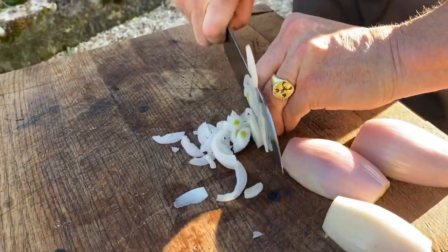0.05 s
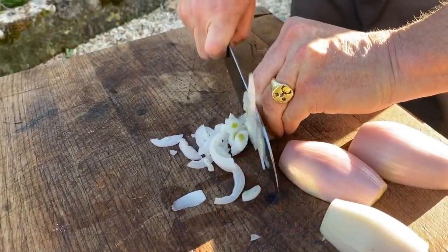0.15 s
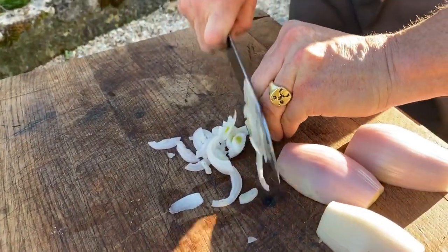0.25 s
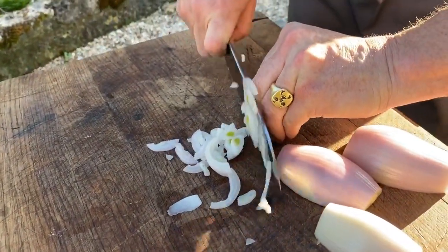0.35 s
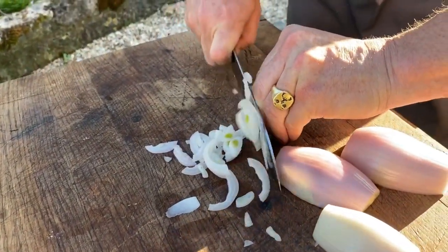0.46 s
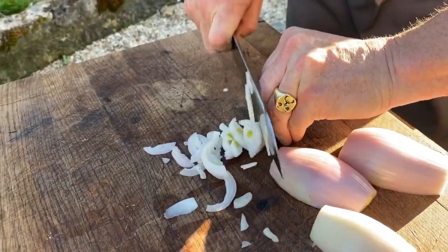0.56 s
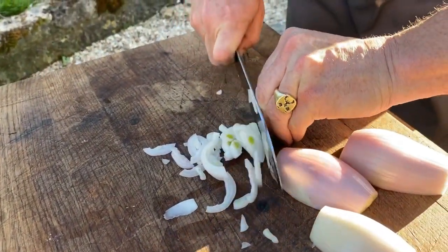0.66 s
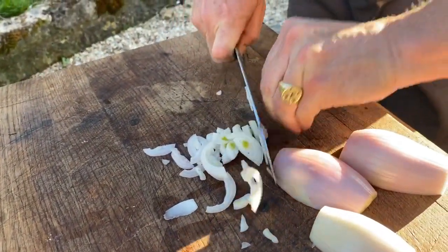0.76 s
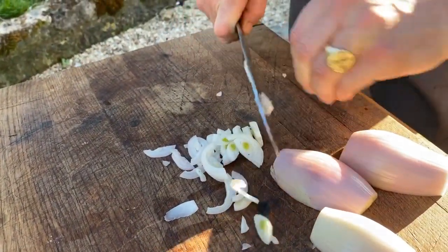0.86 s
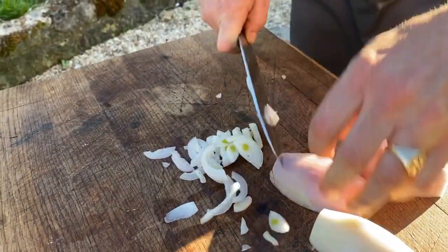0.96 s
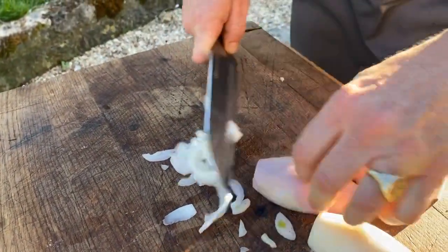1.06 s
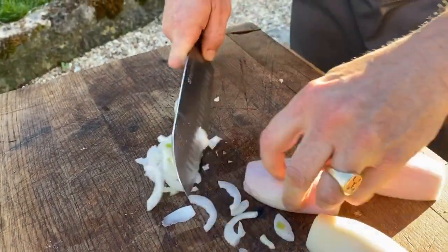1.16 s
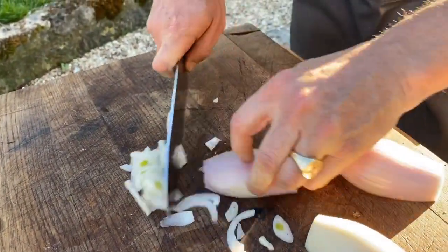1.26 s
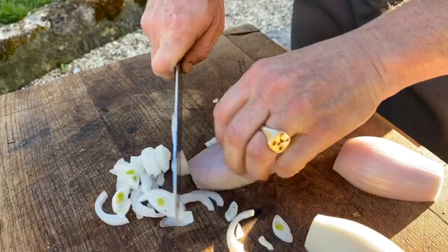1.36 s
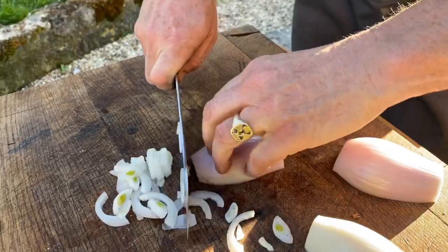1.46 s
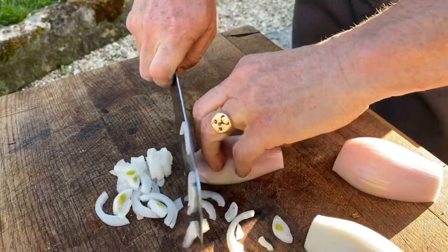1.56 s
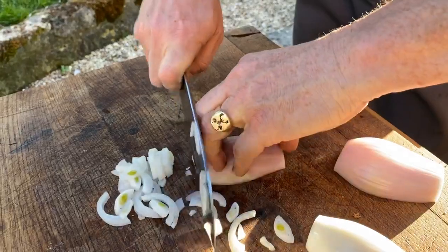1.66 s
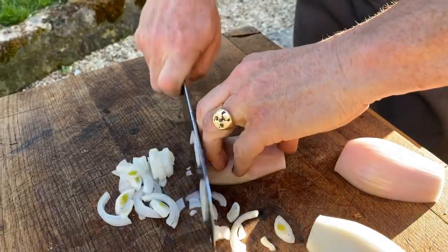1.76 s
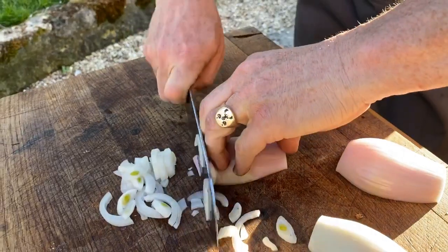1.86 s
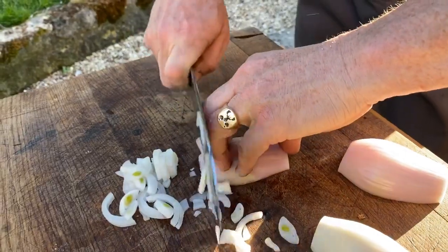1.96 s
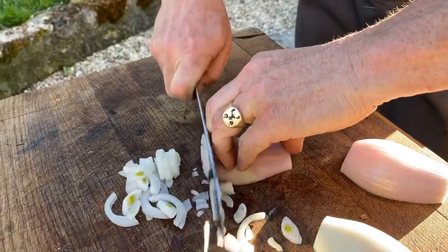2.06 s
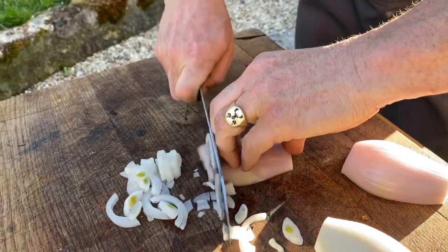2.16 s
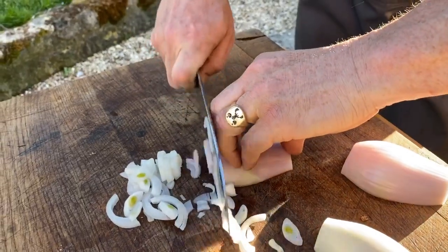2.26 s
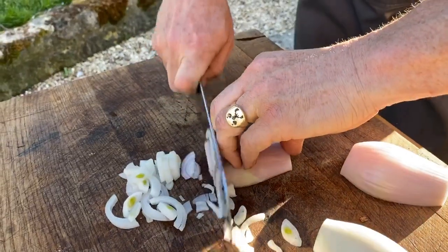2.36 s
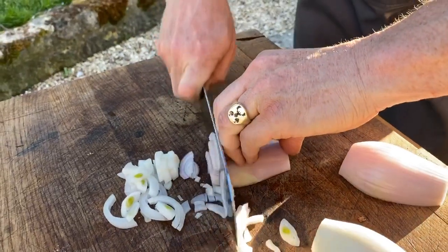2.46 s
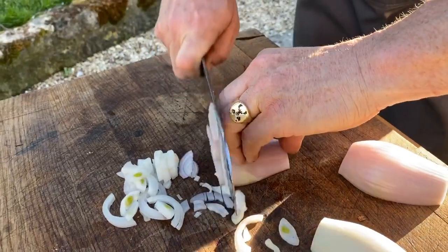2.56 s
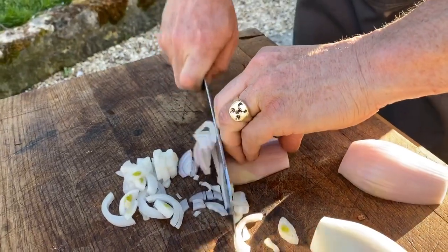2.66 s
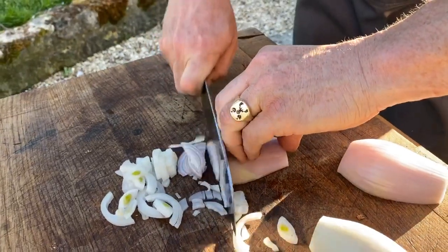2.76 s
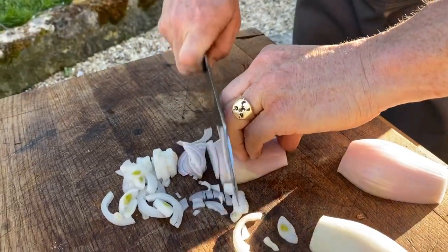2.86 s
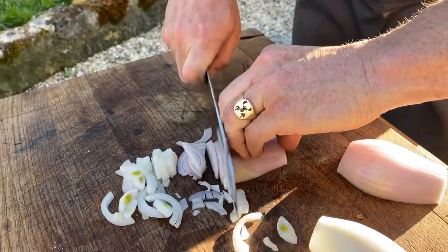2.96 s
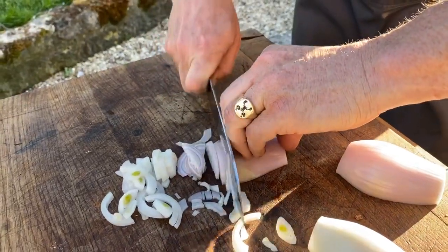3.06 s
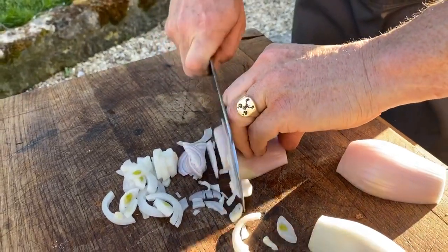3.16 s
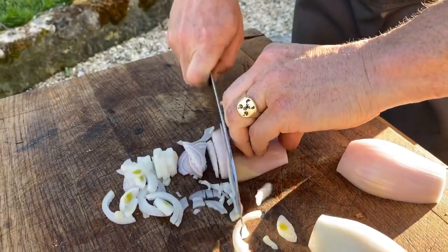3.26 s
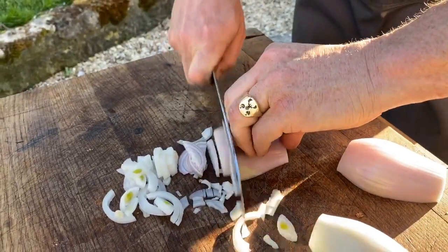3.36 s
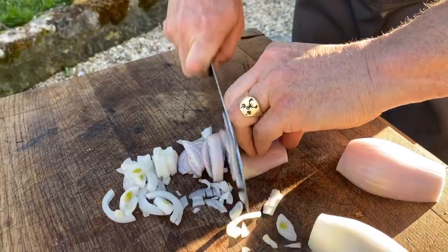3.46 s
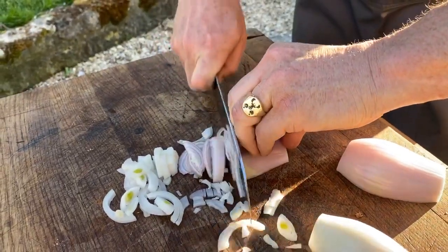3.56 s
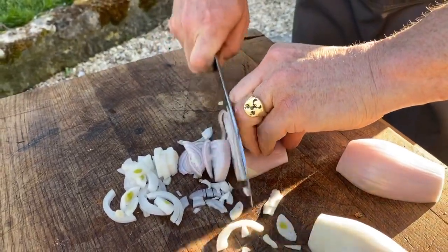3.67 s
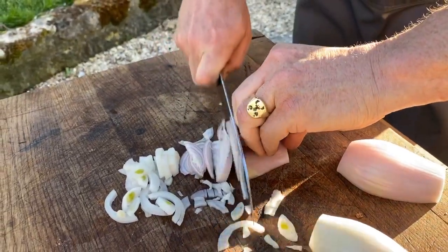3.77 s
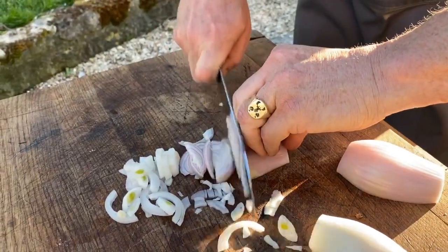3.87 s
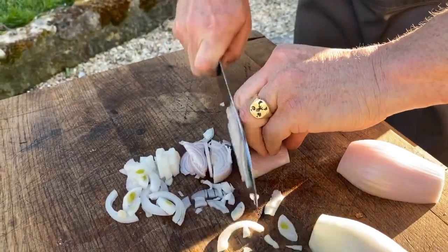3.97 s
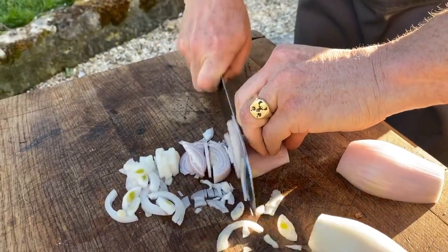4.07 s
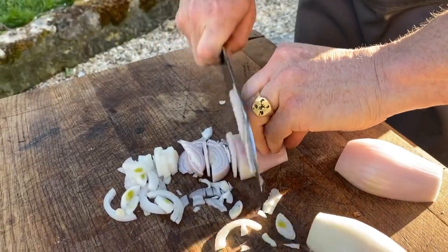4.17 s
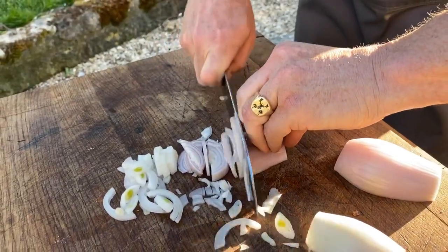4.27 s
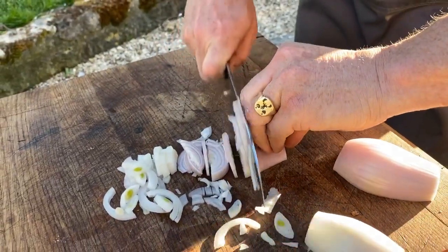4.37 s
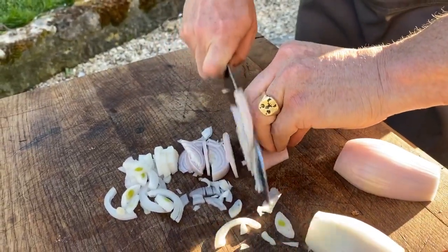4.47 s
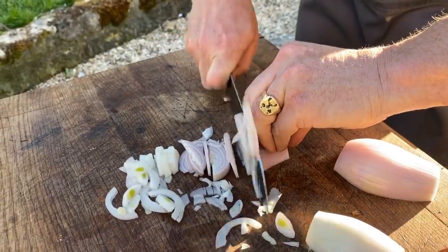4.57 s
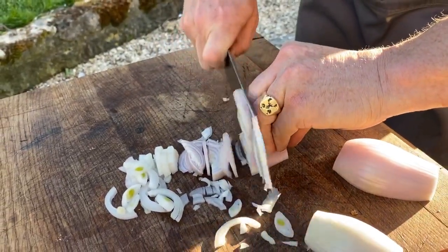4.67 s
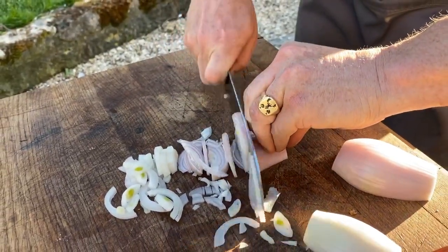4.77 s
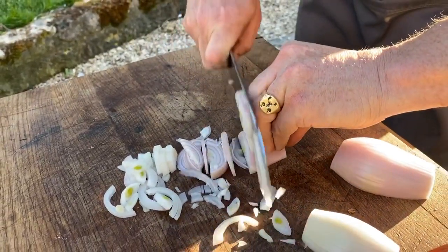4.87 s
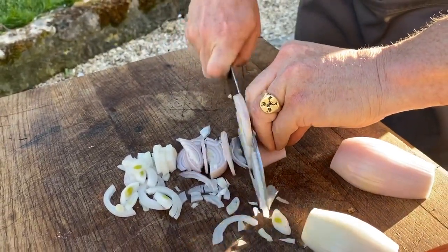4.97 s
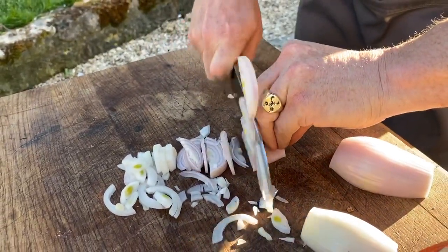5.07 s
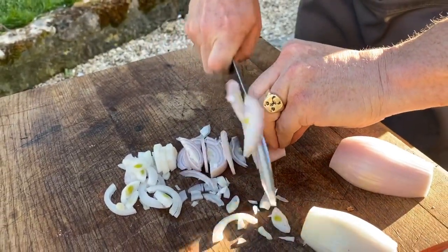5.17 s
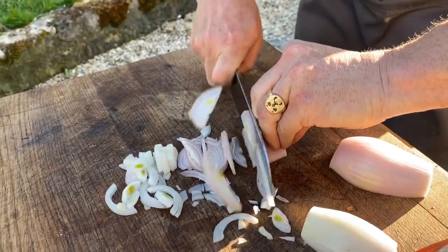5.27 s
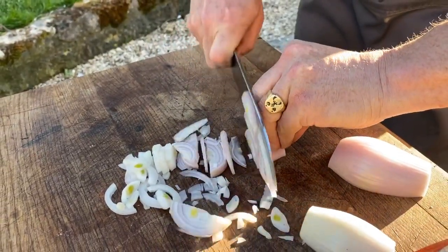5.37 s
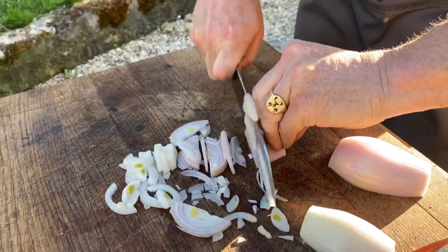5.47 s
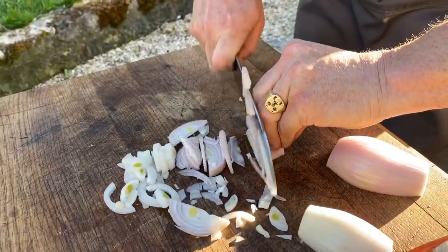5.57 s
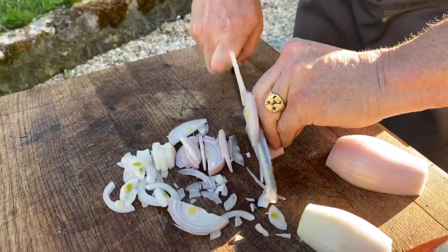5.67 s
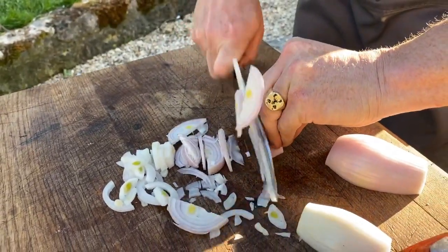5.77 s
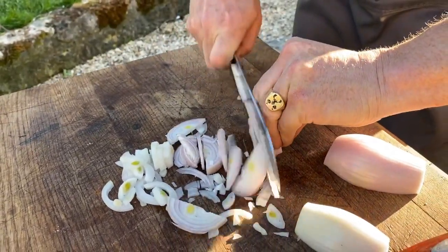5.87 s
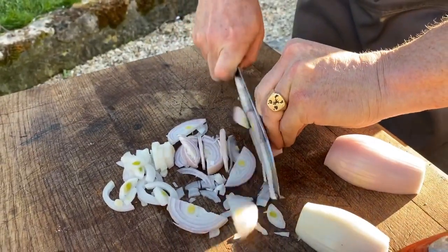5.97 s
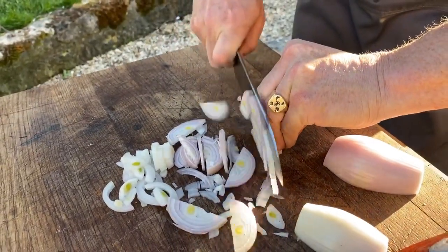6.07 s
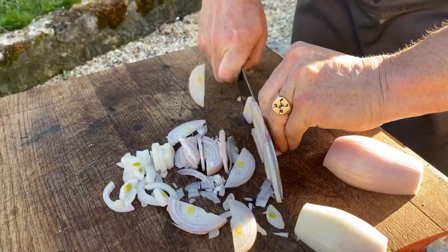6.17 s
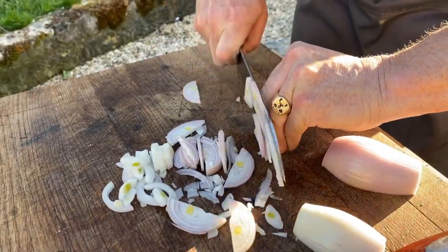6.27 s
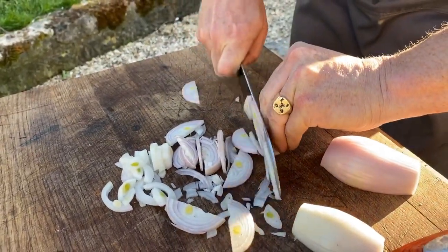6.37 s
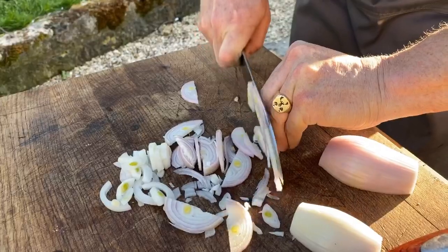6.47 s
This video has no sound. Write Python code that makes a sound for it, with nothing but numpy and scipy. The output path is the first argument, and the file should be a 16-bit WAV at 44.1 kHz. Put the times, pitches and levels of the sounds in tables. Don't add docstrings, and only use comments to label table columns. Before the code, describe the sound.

A knife crunches rapidly through crisp shallots and knocks a thick wooden board outdoors, pauses briefly, then resumes over light wind and distant cicadas.

```python
import sys
import numpy as np
from scipy import signal
from scipy.fft import rfft, irfft, next_fast_len
from scipy.io import wavfile
from scipy.ndimage import uniform_filter1d

SR = 44100
rng = np.random.default_rng(int(sys.argv[2]) if len(sys.argv) > 2 else 0)


def wav_out(sig):
    wavfile.write(sys.argv[1], SR, np.round(np.clip(np.atleast_2d(sig).T, -1, 1) * 32767).astype(np.int16))


def voltage_ratio(level):
    return 10 ** (np.asarray(level, float) / 20)


N = 287973

# board contact in seconds, blow in dB, cut from skin to board in seconds,
# place in dB (brighter towards the stiff end), bite of the edge in dB.
FIRST_BULB_STROKES = [(-0.043, 3.5, 0.023, -1.5, 4.5), (0.1254, 3.5, 0.036, 0, -3), (0.294, 1, 0.021, 3, 0),
                      (0.4607, 0.5, 0.028, -1.5, -12), (0.6308, -1.5, 0.036, 6, -11.5)]
SECOND_BULB_STROKES = [(1.7075, 1.5, 0.0091, -3, 4), (1.866, 2.5, 0.019, -15, 1), (2.022, 0, 0.014, 0, 10.5),
                       (2.1761, 3, 0.021, -24, -6.5), (2.3249, 0.5, 0.021, 11, -1.5),
                       (2.4775, 2, 0.021, 4, 1.5), (2.6325, 2, 0.019, -4, 1.5),
                       (2.7763, -0.5, 0.02, -20, 7.5), (2.926, -22, 0.026, 19, -15),
                       (3.0616, 0.5, 0.027, -8, 3), (3.2278, 1, 0.024, -7, 4.5), (3.393, 3.5, 0.027, -9, -4),
                       (3.576, 1, 0.037, -26, -0.5), (3.7467, 1, 0.045, -4, 0), (3.8925, 3, 0.011, -1, -0.5),
                       (4.0659, 1, 0.026, -18, 8.5), (4.2495, -8.5, 0.034, -13, -9),
                       (4.408, 2, 0.038, -19, 6), (4.5667, 0.5, 0.034, -1, 2.5), (4.738, 0, 0.025, 13, 4.5),
                     (4.9257, 1.5, 0.036, 5, -9), (5.1018, 5, 0.041, -2, -1.5),
                     (5.2592, -1, 0.0223, 9, 11.5), (5.4548, -2.5, 0.063, -2, -4),
                     (5.6164, 3, 0.034, 3, -1.5), (5.7916, 3, 0.036, -14, -1.5),
                     (5.9841, 0, 0.042, -8, -0.5), (6.1602, 1.5, 0.041, 11, -1.5),
                     (6.3332, 2.5, 0.027, 13, -2), (6.5203, 2.5, 0.032, 7, -1)]
STROKES = FIRST_BULB_STROKES + SECOND_BULB_STROKES
# time in seconds, extra crack in dB, extra zing in dB, extra creak in dB.
ODD_STROKES = [(.126, -1, -1, -6), (.461, 10, 7, -13), (.631, 3.5, -13, -1), (2.632, 4, 3, 8.5),
               (3.747, 3, -3, 6), (1.707, -5, 1.5, -11), (2.176, 5, 2.5, -4), (2.477, -7, 5, 4.5),
               (2.777, 10, 6, -0.5), (3.061, 2, 0, 7.5), (3.228, -4, 5.5, 5), (3.893, -4, 5.5, 2),
               (4.066, 1.5, 7.5, 4.5), (4.25, 2, -1, -2), (4.567, 9, 9, -2), (4.738, 12, 1.5, 9),
               (4.926, -11, 0, -1), (5.259, -2, -2, 8), (5.616, 3, 2, 0)]
# time in seconds, blow in dB, steps along the board, steps of edge
SPOTS = [(0.1258, -0.5, -1, -0.1), (0.2939, -0.3, -0.7, 0.5), (0.4606, -4, -0.5, -1.3),
         (0.6304, -6.5, -1.1, -1), (1.7078, -2.7, 3.5, 0.5), (1.8661, -0.1, 1.3, 1.5), (2.0218, 1, 1, -0.1),
         (2.176, 0.9, 0.9, -0.2), (2.325, 0.8, 1.0, 0.5), (2.4774, 0, 2, 1.8), (2.6326, 0.3, 1.0, 0),
         (2.7768, -0.1, 0.9, 2.3), (3.0606, 1, 0.5, -0.5), (3.2275, 0, 1, 0.03), (3.3926, 1, 0.7, 0),
         (3.575, -0.7, 0.1, -0.8), (3.7468, -1.5, -0.3, -1.7), (3.894, 0, 0.84, 1.8),
         (4.0651, 0.5, 0.3, 0.9), (4.25, -13, 1, -3), (4.408, 0.5, 0.1, 0), (4.5674, 0.5, 0.5, 1.7),
         (4.7376, -0.9, -0.6, 2), (4.9255, -1.5, -0.8, 0.04), (5.1029, 0.5, -0.56, 0),
         (5.2591, 0.5, -0.1, 2.5), (5.4537, -8.5, -0.5, -0.9), (5.6161, -0.2, -1.2, 0.2),
         (5.7905, 0.0, -0.56, 0.3), (5.9838, -2, -1.5, 0.3), (6.161, -1, -1.4, 1.4),
         (6.331, -0.5, -0.4, 1.5),
         (-.043, 2, -0.62, 0.16), (2.926, -38, 1, 0.063), (6.5203, -1, -1.9, 0.67)]
# hardness in dB per octave, thud of the table in dB.
LANDINGS = [(3, -1), (-0.5, 4), (1, -1.5), (-0.5, -7), (-1, -19), (-1, 3), (1, -6), (-1, 4), (0., -5),
            (-0.5, 0.), (0., 0.), (0., -3), (-0.4, 2), (13, 12), (0.5, 4), (0., -13), (0., -7), (0.5, -14),
            (0., -15), (0., 8.5), (0., -3), (-4., 4), (1, -15), (0., 8), (-1.5, 2), (0., -9), (1, 3),
            (0., 9), (-2, -9), (0., 0.), (1.5, -1), (0., -4), (0., 4), (0.5, 0.), (-0.5, -5)]

# frequency in Hz, T60 in seconds, signed strength at the left port, at the right.
BOARD_MODES = [(179.0, 0.046, 0.055, 0.036), (272.0, 0.041, -0.047, -0.086), (393.0, 0.12, -0.075, -0.135),
               (427.0, 0.025, 0.32, 0.28), (447.0, 0.14, -0.015, -0.035), (644.0, 0.068, 0.205, -0.09),
               (698.0, 0.032, -0.3, -0.251), (745.0, 0.052, 0.032, 0.138), (825.0, 0.027, -0.24, -0.193),
               (894.0, 0.031, 0.174, 0.187), (980.0, 0.073, 0.005, -0.13), (1090.0, 0.04, 0.02, -0.265),
               (1141.0, 0.025, 0.22, 0.262), (1227.0, 0.038, -0.154, -0.541), (1271.0, 0.04, 0.685, 0.068),
               (1335.0, 0.067, -0.115, 0.168), (1398.0, 0.025, 0.14, 0.632), (1487.0, 0.025, 0.028, 0.248),
               (1547.0, 0.045, -0.102, -0.155), (1630.0, 0.03, 0.006, 0.038), (1706.0, 0.028, 0.197, -0.28),
               (1820.0, 0.038, -0.112, 0.099), (1872.0, 0.025, -0.244, -0.356),
               (1988.0, 0.04, -0.008, -0.042), (2080.0, 0.035, -0.025, -0.03),
               (2170.0, 0.035, -0.024, -0.032), (2260.0, 0.035, 0.008, -0.001),
               (2470.0, 0.03, -0.044, 0.015), (2560.0, 0.03, 0.021, -0.003), (2740.0, 0.03, 0.02, 0.023),
               (2877.0, 0.03, 0.049, 0.007), (3074.0, 0.033, 0.0, -0.008), (3220.0, 0.03, 0.014, 0.012),
               (3560.0, 0.03, 0.029, -0.007), (3680.0, 0.03, 0.024, -0.016), (4120.0, 0.03, 0.032, -0.002),
               (4270.0, 0.03, -0.016, -0.013)]
# frequency in Hz, left and right per step along the board,
# left and right per step of edge tilt.
MODE_SHIFTS = [(179.0, 0.005, 0.009, 0.006, 0.007), (272.0, -0.012, -0.007, -0.011, -0.008),
               (393.0, -0.006, -0.017, 0.015, 0.021), (427.0, 0.033, 0.082, -0.024, -0.032),
               (447.0, -0.004, -0.01, 0.002, 0.004), (644.0, -0.008, 0.029, -0.028, -0.013),
               (698.0, 0.034, -0.03, 0.038, 0.037), (745.0, 0.012, 0.013, 0.003, 0.004),
               (825.0, -0.076, 0.07, 0.018, 0.001), (894.0, 0.088, 0.056, -0.008, -0.012),
               (980.0, -0.009, -0.026, 0.003, -0.001), (1090.0, 0.015, 0.051, 0.022, 0.002),
               (1141.0, -0.015, 0.108, -0.036, -0.03), (1227.0, 0.067, -0.014, -0.001, -0.006),
               (1271.0, -0.018, 0.089, -0.026, -0.006), (1335.0, -0.041, -0.012, -0.001, -0.003),
               (1398.0, 0.073, -0.081, -0.02, -0.069), (1487.0, 0.053, 0.05, 0.033, 0.036),
               (1547.0, 0.006, 0.037, 0.019, 0.007), (1630.0, 0.097, 0.157, 0.033, 0.088),
               (1706.0, 0.097, -0.14, 0.074, -0.062), (1820.0, 0.039, -0.043, -0.044, 0.023),
               (1872.0, 0.117, 0.209, -0.113, -0.099), (1988.0, -0.02, -0.017, -0.01, -0.012),
               (2080.0, -0.063, 0.031, -0.01, -0.012), (2170.0, -0.039, 0.013, -0.012, -0.018),
               (2260.0, 0.025, 0.016, 0.006, -0.012), (2470.0, -0.025, 0.015, -0.022, 0.007),
               (2560.0, 0.005, -0.017, 0.002, 0.016), (2740.0, -0.019, 0.017, 0.007, 0.032),
               (2877.0, 0.001, 0.014, 0.083, 0.034), (3074.0, 0.005, 0.01, -0.01, -0.004),
               (3220.0, -0.004, 0.004, -0.002, -0.026), (3560.0, -0.01, 0.005, -0.012, 0.001),
               (3680.0, -0.016, 0.01, -0.01, 0.007), (4120.0, 0.032, 0.004, 0.012, -0.005),
               (4270.0, -0.006, -0.01, -0.011, -0.008)]
FRAME_HZ = [615, 697, 903, 990, 1182, 1290, 1820]
PLANKS_HZ = [385, 470, 1135, 1170, 1385, 1425, 1690, 1865, 2000, 2285]
# T60 in seconds, level in dB.
TABLE_RINGING = [(.18, -50.5), (0.44, -49), (0.23, -48.5), (0.078, -51), (0.19, -33), (0.21, -39),
                 (0.17, -44.5), (0.25, -42.5), (0.15, -33.5), (0.68, -57), (0.7, -50), (0.57, -50),
                 (0.28, -47.5), (0.27, -50), (0.42, -49.5), (0.35, -56.5), (.4, -58.5)]
# frequency in Hz, density in dB per Hz.
ECHO_SPECTRUM = [(150, -56.5), (250, -15), (393, -5.5), (572, -2), (887, -3.5), (1010, -7), (1200, -2),
                 (2770, -21), (5000, -22.5), (6500, -76), (11000, -120)]

# time in seconds, level in dB.
BREEZE = [(0, -41.5), (.5, -44), (.9, -46.5), (1.6, -59.5), (2.2, -50), (2.7, -54), (3.4, -48.5),
          (4.1, -45), (4.8, -61), (5.2, -42.5), (5.8, -52), (6.53, -51.5)]
# height in seconds, rumble in dB, width in seconds, flutter in dB.
GUSTS = [(.03, -63, 0.098, -47.5), (.24, -44, 0.024, -33.5), (0.412, -38, 0.013, -41.5),
         (1.118, -38, 0.045, -53), (1.48, -44.5, 0.13, -75), (1.87, -39.5, 0.022, -73),
         (2.492, -55, 0.0054, -32), (2.68, -42.5, 0.079, -40), (2.959, -48.5, 0.048, -48),
         (3.24, -56, 0.093, -58), (3.36, -69, 0.068, -50), (3.78, -37, 0.044, -54), (3.89, -36, 0.012, -43),
         (4.03, -29.5, 0.053, -47), (4.249, -33.5, 0.07, -41.5), (4.43, -40, 0.023, -59),
         (4.58, -45, 0.19, -62), (4.748, -42, 0.024, -43), (4.95, -34, 0.038, -40),
         (5.079, -30, 0.058, -53), (5.24, -36.5, 0.065, -50), (5.561, -31, 0.017, -52),
         (5.88, -47, 0.11, -84), (5.97, -41, 0.028, -73), (6.32, -36, 0.062, -69)]
# start in seconds, level in dB, length in seconds.
BUFFETS = [(0.927, -45, 0.017), (1.038, -53, 0.039), (1.097, -56, 0.018), (1.121, -40.5, 0.011),
           (1.163, -46, 0.026), (1.392, -46.5, 0.064), (1.47, -42.5, 0.027), (1.522, -43, 0.019),
           (1.577, -45, 0.024)]

# time in seconds, level in dB.
CICADA_LEVELS = [(0, -47.5), (.82, -53.5), (1.2, -50), (1.55, -51), (2, -47), (3.6, -48.5), (4.5, -51.5),
                 (5.1, -53), (5.7, -47), (6.53, -51)]
# frequency in Hz, density in dB per Hz.
CICADA_SPECTRUM = [(290, -52), (500, -8.5), (620, -16), (1920, -19.5), (2520, -15), (3210, -14.5),
                   (3520, -12.5), (4260, -8), (4740, -6.5), (5800, -7.5), (7000, 1), (8570, -9), (9250, -9),
                   (9400, -18.5), (9550, -9.5), (12500, -21.5), (16200, -54), (22000, -120)]
CICADA_TOP_SPECTRUM = [(12700, -22), (14000, -22.5), (14500, -48), (14700, -87.5)]
# start in seconds, end in seconds, level in dB.
CHIRPS = [
    (0.057, 0.13, -56),
    (0.228, .285, -57),
    (0.387, .445, -57),
    (2.11, 2.165, -61),
]

# extra crunch in dB, crunch change from skin to board in dB.
JUICY_CUTS = [(3.5, -3), (4, -0.5), (-2.5, 5), (-2.5, 1.5), (6, -13), (-4, 10.5), (0, 6), (-0.5, 1),
              (-3, 4), (0., 2), (-1, 3.5), (2, -5), (-1, -2), (-4, 4), (-0.5, 2), (0.5, -4.5), (-2.5, 0),
              (-3.5, 1.5), (-11, 13.5), (1.5, 2), (3, -5.5), (-2, 5), (-3, -3.5), (2.5, 3), (-3.5, 4),
              (-2, 1.5), (0, -12), (-6, 2), (-1.5, 1.5), (-1.5, 2), (-8, 6), (-5.5, 4), (-4, 5),
              (-7.5, 7.5)]
# frequency in Hz, density in dB per Hz.
CRUNCH_SPECTRUM = [(300, -12.5), (730, -7.5), (1230, -25), (2100, -7.5), (6000, -14), (12500, -17),
                   (14000, -21), (14400, -62)]
# frequency in Hz, density in dB per Hz.
AIR_SPECTRUM = [(14000, -37), (14500, -5), (15200, -18), (15800, -8.5), (16100, -35)]
# frequency in Hz, density in dB per Hz.
BLADE_SPECTRUM = [(8000, -22), (10000, -10), (10300, 0), (10650, -10), (11000, -8), (11250, 3), (11550, -8),
                  (12500, -10), (12700, -50)]
# start in seconds, level in dB, length in seconds, brightness in dB.
TOUCHES = [(0.914, -59, 0.011, 14), (0.99, -60.5, 0.072, 0.5), (1.057, -52, 0.012, -5),
           (1.198, -51, 0.051, -1), (1.335, -81, 0.015, 14), (1.39, -58, 0.017, 6.5)]

# frequency in Hz, lag of the left in half turns, likeness from 0 to
LEFT_RIGHT_PHASE = [(1500, -1, .2), (3000, 0, .6), (4300, 1, .9), (5500, 2, .9), (7000, 3, .6), (9000, 4, .7),
                    (9500, 3.3, .7), (10200, 3.8, .95), (10300, 4, 1), (11800, 4, 1), (11950, 4.5, 1), (12450, 4.6, 1),
                    (12550, 5, 1), (14500, 5, 1), (14600, 6, 1), (20000, 6, 1)]


def colour(x, points):
    hz, db = np.transpose(points)
    size = next_fast_len(N)
    bins_hz = np.arange(size // 2 + 1) * SR / size
    gain = voltage_ratio(np.interp(np.log(bins_hz + 1), np.log(hz), db, -150, -150))
    y = irfft(rfft(x, size) * gain, size)[..., :N]
    return y / np.sqrt(np.mean(y ** 2))


def pair(likeness):
    mid, side = rng.standard_normal((2, N))
    signs = np.array([[1], [-1]])
    return (np.sqrt(1 + likeness) * mid + np.sqrt(1 - likeness) * side * signs) / np.sqrt(2)


def phased_pair(scatter):
    hz, half_turns, likeness = np.transpose(LEFT_RIGHT_PHASE)
    f = np.arange(N // 2 + 1) * SR / N
    alike = np.interp(f, hz, likeness) ** scatter
    turn = np.exp(-1j * np.pi * np.interp(f, hz, half_turns))
    shared, left, right = rfft(rng.standard_normal((3, N)))
    common = np.sqrt(alike) * shared * np.array([turn, np.ones_like(turn)])
    return irfft(common + np.sqrt(1 - alike) * np.array([left, right]), N)


def walk(rate_hz):
    k = int(SR / rate_hz)
    held = np.repeat(rng.standard_normal(N // k + 1), k)
    return uniform_filter1d(uniform_filter1d(held, k), k)[:N]


def gate(start_s, end_s, attack_s, release_s):
    t = np.arange(N) / SR
    return np.clip((t - start_s) / attack_s, 0, 1) * np.exp(-np.clip(t - end_s, 0, None) / release_s)


def level_curve(table):
    s, db = np.transpose(table)
    return np.interp(np.arange(N) / SR, s, db)


def ring(t, hz, t60_s, strength, lead=0, sway=1):
    decay = voltage_ratio(-60 * t / t60_s[:, None])
    return strength @ (sway * decay * np.sin(2 * np.pi * hz[:, None] * t + lead))


def add(out, s, sound):
    i = int(s * SR)
    out[..., max(i, 0):i + sound.shape[-1]] += sound[..., max(-i, 0):N - i]


def odd(s):
    return next((extra for at, *extra in ODD_STROKES if abs(at - s) < .02), (0, 0, 0))


def knocks():
    out, t = np.zeros((2, N)), np.arange(SR // 3) / SR
    hz, t60_s, *usual = np.transpose(BOARD_MODES)
    per_step, per_tilt = np.transpose(MODE_SHIFTS)[1:].reshape(2, 2, -1)
    table_hz = np.array(FRAME_HZ + PLANKS_HZ)
    table_t60_s, table_db = np.transpose(TABLE_RINGING)
    modes = len(table_hz)
    splinter = colour(pair(0.62), [(1500, -4.5), (2200, -8.5), (3100, 4), (3500, -13), (4500, -55)])
    tick = colour(pair(0.32), [(3000, -39.5), (3600, 2.0), (4200, -7.5), (4600, -4.0), (7000, -59.0)])
    sway = voltage_ratio(3.5 * walk(30))
    sway_index = np.arange(len(t)) + SR // 3 * np.arange(modes)[:, None]
    chance = rng.standard_normal((len(STROKES), 2, len(BOARD_MODES)))
    spots = sorted(SPOTS)
    for stroke, spot, (swing, detune), (hard_db, _) in zip(STROKES, spots, chance, LANDINGS):
        s, db, _, place_db, bite_db = stroke
        at, blow_db, step, tilt = spot
        i = int(s * SR)

        mode_db = blow_db - db + hard_db * np.log2(hz / 1100) + 0.92 * swing + 1.2 * (hz > 2000)
        mode_db = mode_db + 0.51 * (bite_db - 13.0) * ((hz > 2600) & (hz < 3400))
        strength = (usual + step * per_step + tilt * per_tilt) * voltage_ratio(mode_db)
        board = ring(t, hz * (1 + 0.0032 * detune), t60_s, strength)

        hands = sway[(i + sway_index) % N]
        detuned_hz = table_hz * (1 + 0.0043 * detune[:modes])
        table_strength = voltage_ratio(table_db + 1.5 * swing[:modes])
        table = np.array([ring(t, detuned_hz, table_t60_s, table_strength, lead, hands)
                          for lead in (.5, -.5)])

        crack_db = 0.12 * place_db + 0.64 * bite_db + odd(s)[0]
        tick_db = 0.67 * bite_db - 3.5
        crack = splinter * voltage_ratio(crack_db) + tick * voltage_ratio(tick_db)
        crack = np.roll(crack, -i, axis=1)[:, :len(t)] * voltage_ratio(-29 - 60 * t / 0.039)

        spread = 1 - np.exp(-t / .00092)
        add(out, at, (board + table + crack) * spread * voltage_ratio(db + 1.5))
    return out


def echoes():
    t, swell, out = np.arange(SR // 3) / SR, np.zeros(N), np.zeros((2, N))
    t60_s, lag_s = 0.26, 0.0049
    tail = voltage_ratio(-30 - 60 * t / t60_s) * (1 - np.exp(-(t / lag_s) ** 2))
    noise = colour(pair(0.04), ECHO_SPECTRUM)
    peaks = sum(signal.lfilter(*signal.iirpeak(hz, hz / 35, SR), noise)
                for hz in FRAME_HZ + PLANKS_HZ[:2])
    noise = noise + 2.5 * peaks
    for s, db, *_ in STROKES:
        add(swell, s, voltage_ratio(db - 9) * tail)
        add(out, s, voltage_ratio(db - 7.0) * tail * noise[:, :len(t)])
    return out + swell * noise


def wind():
    t, breeze_db = np.arange(N) / SR, level_curve(BREEZE)
    rumble = colour(pair(0.58) * voltage_ratio(0.91 * walk(34)),
                    [(15, -36.0), (35, -5.0), (70, 3.0), (120, -2.5), (200, -9.5), (400, -39.0)])
    flutter = colour(pair(.8) * voltage_ratio(3.5 * walk(45)),
                     [(80, -33), (170, -6.5), (300, -8.5), (500, -13.5), (700, -35.0), (1200, -55.0)])
    rumble_gain, flutter_gain = voltage_ratio(breeze_db), voltage_ratio(breeze_db - 9.5)
    for s, rumble_db, width_s, flutter_db in GUSTS:
        swell = np.exp(-((t - s) / width_s) ** 2)
        rumble_gain = rumble_gain + voltage_ratio(rumble_db) * swell
        flutter_gain = flutter_gain + voltage_ratio(flutter_db) * swell
    for s, db, length_s in BUFFETS:
        flutter_gain = flutter_gain + voltage_ratio(db) * gate(s, s + length_s, 0.0043, 0.004)
    shake = sum(voltage_ratio(-34 + db + shake_db) * gate(s, s, 0.0015, 0.013)
                for (s, db, *_), (_, shake_db) in zip(STROKES, LANDINGS))
    thud = colour(rumble, [(40, -31.5), (100, 8.5), (200, 8.0), (400, -9.5)]) * shake
    return rumble * rumble_gain * voltage_ratio([[1.3], [-1.3]]) + flutter * flutter_gain + thud


def insects():
    level_db = level_curve(CICADA_LEVELS)
    for s, db, *_, bite_db in STROKES:
        duck_db = max(3.5 + 0.72 * bite_db, 0) * voltage_ratio(db)
        level_db = level_db - duck_db * gate(s, s, 0.0019, 0.23)
    chorus = colour(phased_pair(0.98), CICADA_SPECTRUM[:-2] + CICADA_TOP_SPECTRUM) * voltage_ratio(1.7 * walk(42))
    patches = np.zeros((2, N))
    for hz in (14700, 15200, 15700):
        band = colour(pair(1), [(hz - 260, -40), (hz - 200, 0), (hz + 200, 0), (hz + 260, -40)])
        patches += voltage_ratio(-29) * band * np.clip(6 * walk(24) - 3.5, 0, 1)
    singer = colour(pair(0.0), [(3300, 0.0), (3500, -6), (3600, 15), (3800, -40.5)])
    singer = singer * voltage_ratio([[-26], [-18]])
    chirp_hz = 3690
    cricket = colour(pair(1.0), [(chirp_hz - 80, -30), (chirp_hz, 0), (chirp_hz + 80, -30)])
    chirps = sum(voltage_ratio(db) * gate(start, end, 0.0029, 0.0039) for start, end, db in CHIRPS)
    return (chorus + patches + singer) * voltage_ratio(level_db + 6.5) + cricket * chirps


def crunch():
    out = np.zeros((2, N))
    grains = phased_pair(2.5) * voltage_ratio(1.5 * walk(90) + 3 * walk(300) + 5 * walk(1500))
    juice = colour(grains, CRUNCH_SPECTRUM) + voltage_ratio(-20.0) * colour(grains, AIR_SPECTRUM)
    fibre = colour(grains, [(300, -11.5), (700, -4), (1280, 5.0), (1900, -3.0), (3000, -36)])
    steel = colour(phased_pair(3.0), BLADE_SPECTRUM)
    for (end, blow_db, cut_s, place_db, bite_db), (juicy_db, fade_db) in zip(STROKES[1:], JUICY_CUTS):
        start = end - cut_s
        depth = np.clip((np.arange(N) / SR - end) / cut_s + 1, 0, 1)
        speed_db = 20 * np.log10(.025 / cut_s)
        _, odd_zing_db, odd_creak_db = odd(end)

        crunch_db = -38 + juicy_db + 0.047 * speed_db - 5 * (end < 1)
        skin = voltage_ratio(-29.5) * gate(start, start, 0.00093, 0.0055)
        flesh = voltage_ratio(fade_db * depth) * gate(start, end, 0.24 * cut_s, 0.0066)
        squash = voltage_ratio(-1 + blow_db) * gate(end, end + 0.0036, 0.012, 0.02)
        out += voltage_ratio(crunch_db) * juice * (skin + flesh + squash)

        creak_db = -34 + 1.5 * speed_db + 0.44 * blow_db - 0.19 * place_db + 0.29 * juicy_db
        out += voltage_ratio(creak_db + odd_creak_db) * fibre * gate(start, end, cut_s, 0.022)

        zing_db = -35.5 + bite_db + blow_db + odd_zing_db
        out += voltage_ratio(zing_db) * steel * gate(end, end + 0.0024, 0.015, 0.006)
    for s, db, length_s, bright_db in TOUCHES:
        out += voltage_ratio(db) * gate(s, s + length_s, 0.0097, 0.005) * (fibre + voltage_ratio(bright_db) * juice)
    return out


def scene():
    return knocks() + echoes() + wind() + insects() + crunch()


def low_pass(x):
    return signal.sosfilt(signal.butter(12, 16500, fs=SR, output="sos"), x)


def record(dry):
    limited = dry / (1 + np.abs(dry / .97) ** 5) ** .2
    return low_pass(limited)


dry = scene()
out = record(dry)
wav_out(out)
```